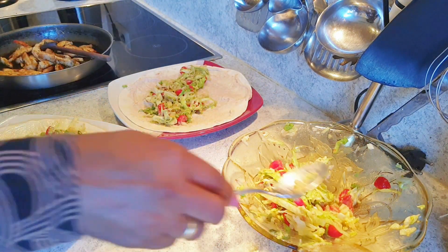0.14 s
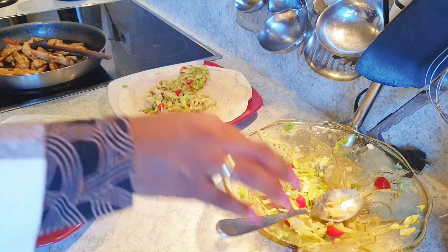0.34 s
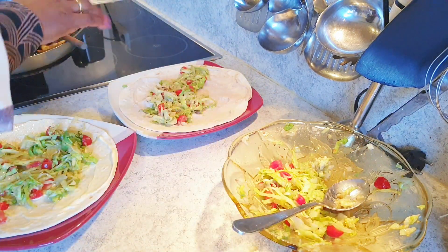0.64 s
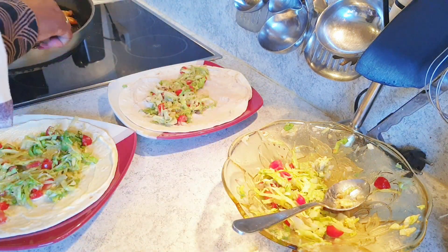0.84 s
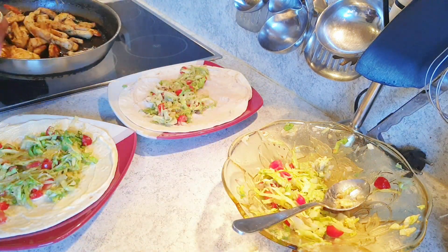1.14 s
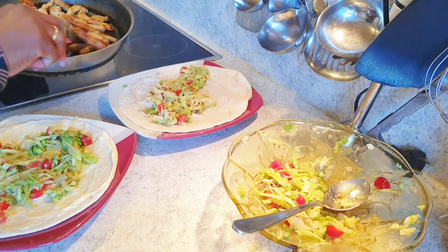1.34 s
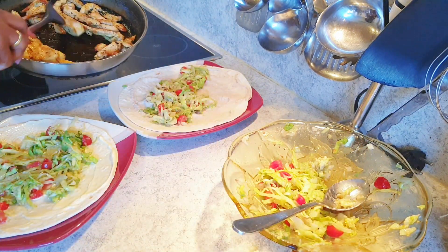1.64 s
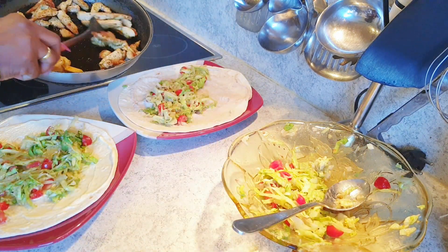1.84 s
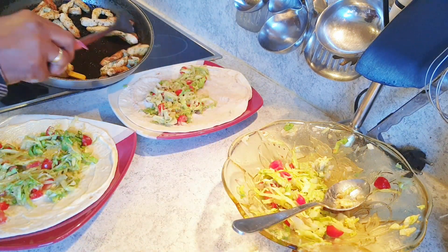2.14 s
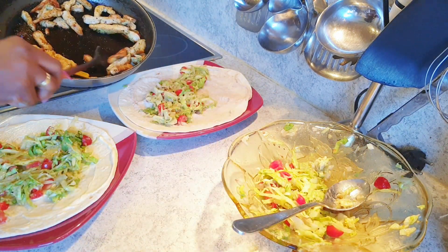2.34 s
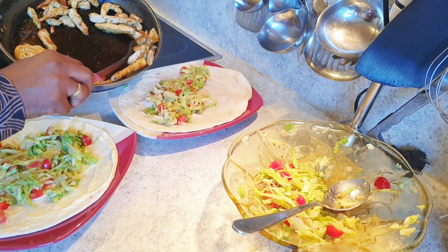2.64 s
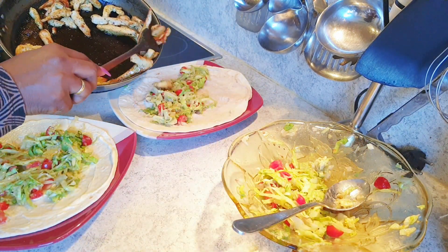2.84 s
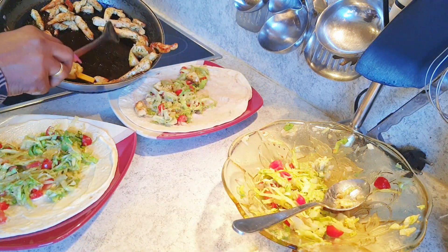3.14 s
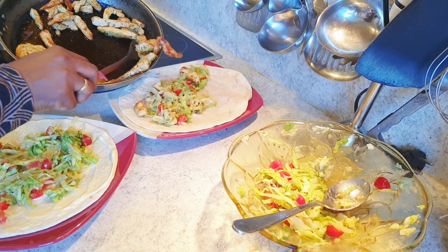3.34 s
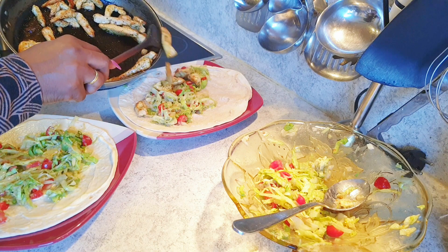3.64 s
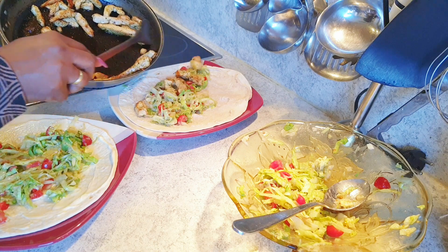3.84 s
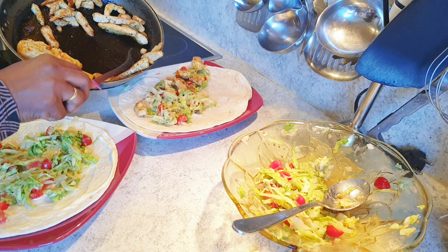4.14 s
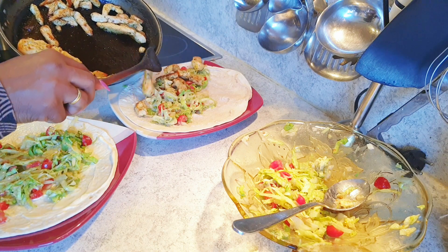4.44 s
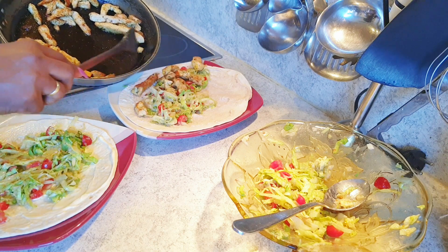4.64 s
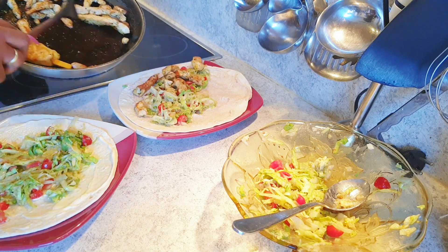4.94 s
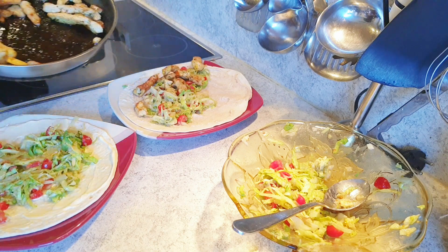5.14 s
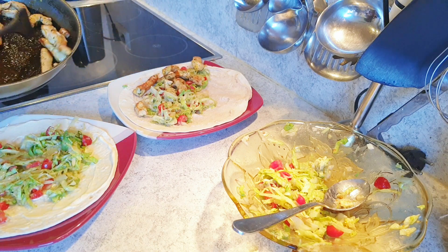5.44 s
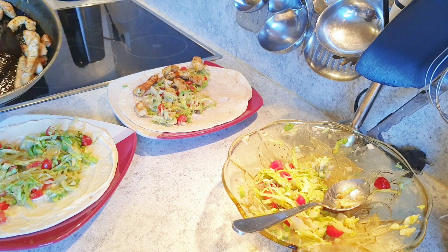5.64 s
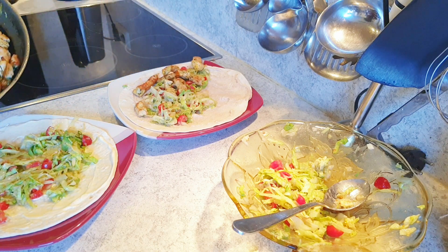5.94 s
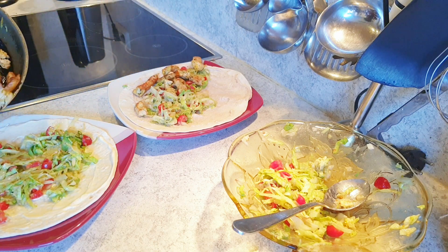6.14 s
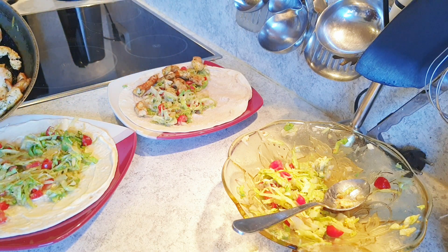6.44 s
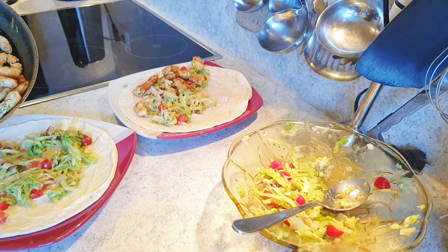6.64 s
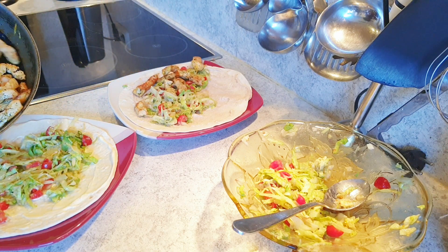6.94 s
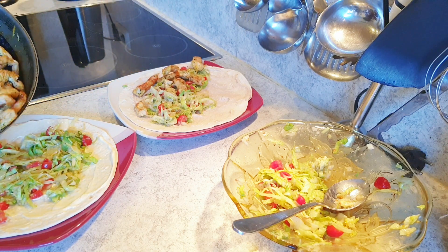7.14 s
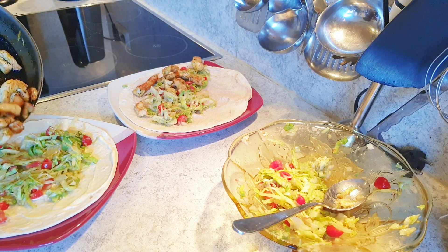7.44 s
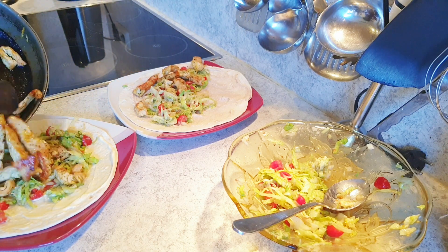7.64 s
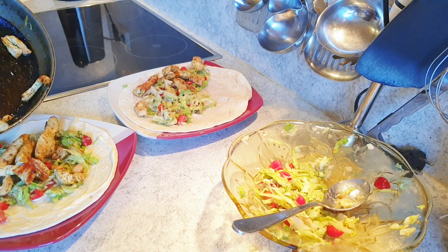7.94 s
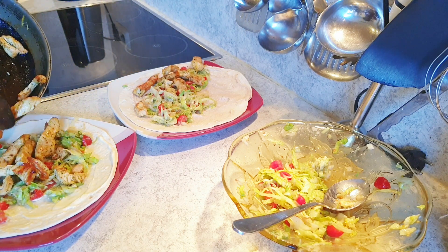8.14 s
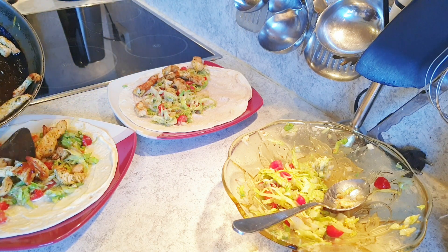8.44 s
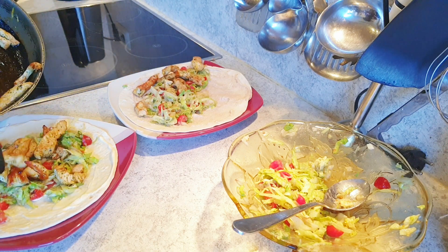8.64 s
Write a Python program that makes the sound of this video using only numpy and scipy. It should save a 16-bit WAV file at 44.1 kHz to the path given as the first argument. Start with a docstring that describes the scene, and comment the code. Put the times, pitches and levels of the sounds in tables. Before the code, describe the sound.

Over steady low humming and rumbling, a metal spoon bounces and settles in a glass bowl with a quick bright clatter. Softer spatula taps and gritty scrapes ring a pan; the heavy pan bumps the counter and drags with a short groan. After a quieter pause and soft greasy hiss, firmer clinks follow, then tiny wet smacks. Near microphone, short lively kitchen reflections.

```python
"""Filling tortillas in a small kitchen, with an appliance humming and rumbling throughout.
A sleeve rustles (filtered friction noise) and a steel spoon rattles to rest in a glass bowl (rung modes).
A spatula then taps and scrapes a ringing frying pan, which knocks and drags on the worktop (stick-slip).
Chicken hisses across the tipped pan, and pieces smack and plop onto a plate (short noise, ticking modes)."""
import sys
import numpy as np
from scipy import signal
from scipy.fft import rfft, irfft
from scipy.io import wavfile

SR = 44100
rng = np.random.default_rng(int(sys.argv[2]) if len(sys.argv) > 2 else 0)


def master_out(mix):
    """Clip the mix to full scale and print it as 16-bit PCM to the path in sys.argv[1]."""
    frames = np.transpose(np.atleast_2d(mix))
    ceiling = np.clip(frames, -1, 1)
    pcm = np.round(ceiling * 32767).astype(np.int16)
    wavfile.write(sys.argv[1], SR, pcm)


N = 388080
TIME = np.arange(N) / SR
CONTACT_TIME = TIME[:SR]  # every contact is computed over one second

# frying pan, close groups of modes: mode_hz, level_db, t60_s, left_minus_right_db
PAN_MODES = [(892, -11, .12, 0), (929, 0, .17, 3), (965, -10, .14, -2), (1021, -16, .18, -4),
             (1060, -12, .025, -1), (1250, -19, .03, -1), (1965, -10, .2, 0), (1995, -11, .22, 1),
             (2026, -6.5, .21, 0), (2100, -14, .03, 0), (3095, -21, .1, -3), (3135, -18, .12, -3),
             (3178, -21, .1, -5), (4350, -30, .1, -2), (4900, -31, .1, -2)]
DRAG_SLIDE = 0.81  # 0 all crunch, 1 full judder


def undb(db):
    """Decibels to gain."""
    return 10 ** (np.asarray(db) / 20)


def sides(pan_db):
    """Left and right gains of equal total power; pan_db is left minus right."""
    gain = undb(np.array([[pan_db], [-pan_db]]) / 2)
    return gain / np.sqrt(np.mean(gain ** 2))


def unit(x):
    """Scale to the energy of a twentieth of a second at full level."""
    return x / np.sqrt(np.sum(x ** 2) * 20 / SR)


def add(out, start_s, x):
    """Mix x into out from start_s."""
    start = max(int(start_s * SR), 0)
    out[:, start:start + x.shape[-1]] += x[..., :N - start]


def lowpass(x, order, cutoff_hz):
    """Butterworth low-pass."""
    return signal.sosfilt(signal.butter(order, cutoff_hz, fs=SR, output="sos"), x)


def highpass(x, order, cutoff_hz):
    """Butterworth high-pass."""
    return signal.sosfilt(signal.butter(order, cutoff_hz, "high", fs=SR, output="sos"), x)


def colour(x, points, size=4096):
    """Minimum-phase filter with a (Hz, dB) response, by folding the cepstrum."""
    hz, db = np.transpose(points)
    freq_hz = np.maximum(np.fft.rfftfreq(size, 1 / SR), 1)
    response_db = np.interp(np.log(freq_hz), np.log(hz), db)
    cepstrum = irfft(np.log(undb(response_db)))
    cepstrum[1:size // 2] *= 2
    cepstrum[size // 2 + 1:] = 0
    impulse = irfft(np.exp(rfft(cepstrum)))
    return signal.fftconvolve(x, impulse)[:len(x)]


def walk(t, rate_hz):
    """Random knots joined by straight lines, with a spread near 1."""
    knots = rng.standard_normal(4096)
    return np.interp(t * rate_hz, np.arange(len(knots)), knots)


def stroke(rise_s, fade_s, touch=0):
    """Pressure builds up from a first touch, then lets go exponentially."""
    t = CONTACT_TIME
    rise = np.minimum(touch + (1 - touch) * t / rise_s, 1)
    return rise * np.exp(-np.maximum(t - rise_s, 0) / fade_s)


def friction(pressure, slip_db=3, slip_rate_hz=350, grain_db=3):
    """Contact force: tiny catches, bunched into slips."""
    t = CONTACT_TIME
    grain = undb(grain_db * rng.standard_normal(len(t)))
    catches = rng.standard_normal(len(t)) * grain
    return pressure * catches * undb(slip_db * walk(t, slip_rate_hz))


def judder(pressure, wander=.11, slip_width=0.044):
    """A dragged pan sticks and slips in an uneven rhythm; slip_width is a share of the cycle."""
    judder_hz = 158.6
    t = CONTACT_TIME
    phase = np.cumsum(judder_hz * (1 + wander * walk(t, 60))) / SR % 1
    slips = np.exp(-phase / slip_width) * undb(6 * walk(t, 150))
    crunch = unit(friction(pressure, slip_db=8.5, slip_rate_hz=270))
    return crunch + DRAG_SLIDE * unit((slips - slips.mean()) * pressure)


def ring(force, modes, tilt_db, pivot_hz, bend=1, detune=0.0033, locked=0):
    """Damped modes share a contact's energy: hard contacts favour high modes, locked force makes them sing."""
    longest_ring_s = .27  # no mode rings longer than this: t60 is capped here
    out = 0
    for k, (hz, db, t60_s, pan_db) in enumerate(modes):
        # each contact detunes the modes a little differently
        loaded_hz = hz * (1 + detune * rng.uniform(-1, 1))
        decay = np.log(1000) / min(t60_s, longest_ring_s)
        pole = np.exp((2j * np.pi * loaded_hz - decay) / SR)
        # the locked force sticks and slips in step with the mode
        in_step = locked * np.cos(2 * np.pi * loaded_hz * CONTACT_TIME)
        z = signal.lfilter([1], [1, -pole], unit(force) + in_step)
        # short waves reach the two microphones out of step
        lag = np.exp(1j * (-1) ** k * min(hz / 620, np.pi / 2))
        # bend above 1: hardness matters most far from the pivot
        octaves = np.log2(hz / pivot_hz)
        gain = undb(db + tilt_db * np.sign(octaves) * abs(octaves) ** bend)
        out = out + gain * sides(pan_db) * np.array([unit(z.real), unit((z * lag).real)])
    return out


def muffle(x):
    """The spatula and the worktop are too soft to ring anything much higher than the cutoff."""
    return lowpass(x, 3, cutoff_hz=7040)


def diffuse(length, split_hz):
    """Stereo noise, alike in the bass and unrelated above split_hz."""
    mid, side = rng.standard_normal((2, N))[:, :length]
    side = highpass(side, 1, split_hz)
    return np.array([mid + side, mid - side]) / np.sqrt(2)


def kitchen(x, wet_db, build_s=0.0071):
    """Hard walls close by: a dense short tail whose treble dies a little sooner."""
    t60_s, treble_t60_s = 0.36, 0.3
    t = TIME[:SR * 2 // 3]
    noise = diffuse(len(t), split_hz=1900)
    low = lowpass(noise, 1, 4000)
    low_tail = low * np.exp(-np.log(1000) * t / t60_s)
    treble_tail = (noise - low) * np.exp(-np.log(1000) * t / treble_t60_s)
    tail = (low_tail + treble_tail) * np.minimum(t / build_s, 1)
    tail /= np.sqrt(np.sum(tail ** 2, axis=1, keepdims=True))
    wet = undb(wet_db)
    return (x + wet * signal.fftconvolve(x, tail, axes=1)[:, :N]) / np.hypot(1, wet)


def spoon():
    """The spoon bounces and skids in the glass bowl: a sharp click, then the glass and steel sing."""
    # spoon on the bowl: start_s, contact_s, level_db, hardness_tilt_db_per_octave
    contacts = [(0.086, 0.016, -45, 2.5), (.157, 0.001, -37.5, 6), (0.1904, 0.0034, -17, 6),
                (.204, 0.015, -27.5, -6), (0.2122, 0.0061, -23, -2.5), (0.2464, 0.00091, -22.5, 3.5),
                (.267, 0.01, -19, 1.5), (.280, 0.0076, -29.5, -3.5), (0.32, 0.0094, -17.5, 4.5),
                (0.3358, 0.0034, -21, -2)]
    # bowl and spoon: mode_hz, level_db, t60_s, left_minus_right_db
    bowl_modes = [(240, -24.5, 0.14, -7.5), (333, -15.5, 0.19, -11.5), (598.6, -3, .17, -3.5),
                  (620, -9, 0.12, -3), (846.5, -11, 0.35, -12.5), (1394, -9.5, .25, -2.5),
                  (2192, -4, 0.24, -4), (2597, -6, 0.21, -0.5), (3125, 2, 0.182, -10),
                  (4222, -4.5, 0.35, -7), (4490, -5, 0.18, -4.5), (4830, -9.5, 0.28, -11),
                  (5260, -4, .1, -3), (5490, 2, .07, -4), (5598, -3, .06, -3), (6702, -8, .15, -3),
                  (6831, -4, .17, -2), (8046, -8, .17, -5), (8300, -9.5, 0.089, -9),
                  (8700, -6, 0.033, -4.5), (11970, -13.5, .1, -4)]
    # click spectrum: freq_hz, level_db
    click_colour = [(40, -4), (200, -11), (450, -10.5), (800, -8.5), (1500, -5), (3000, -5.5), (4300, -5),
                    (5500, -0.5), (7300, -10), (8600, -9), (9800, -17), (11000, -8), (13500, -14),
                    (16000, -17.5)]
    rise_share = 0.16  # of the contact time
    click_per_tilt = .4  # dB of click per dB per octave of hardness
    noise, tone = np.zeros((2, 2, N))
    for start_s, contact_s, db, tilt_db in contacts:
        force = friction(stroke(rise_share * contact_s, contact_s), slip_db=10.5, grain_db=6)
        hard_db = click_per_tilt * tilt_db
        click = unit(colour(force, click_colour))
        add(noise, start_s, sides(pan_db=-2.5) * undb(db + hard_db - 4.0) * click)
        sing = ring(force, bowl_modes, tilt_db, pivot_hz=3220)
        add(tone, start_s, undb(db - hard_db - 9.0) * sing)
    return kitchen(noise, wet_db=4.5) + kitchen(tone, wet_db=-5.5)


def tap_hiss(thud_db):
    """Hiss level: only a heavy tap cracks through the film of grease."""
    heavy_db, hiss_db = -28, -13  # hiss is relative to a heavy thud
    hiss_per_db = 1.9  # lighter thuds lose their hiss faster than their weight
    return thud_db + hiss_db + hiss_per_db * (thud_db - heavy_db)


def spatula_contacts():
    """Taps set in fast and ring duller when soft; longer scrapes let go more slowly."""
    # taps on the pan wall: start_s, contact_s, ring_db, thud_db
    taps = [(.648, 0.019, -42.5, -50.5), (1.0911, 0.026, -29.5, -54), (1.179, .016, -34.5, -55.5),
            (1.365, 0.012, -64, -63.5), (1.641, 0.05, -27.5, -43), (2.176, 0.069, -19.5, -43),
            (5.131, 0.03, -35.5, -54), (5.1642, 0.024, -20, -38.5), (5.451, 0.026, -26, -38.5),
            (6.2755, 0.012, -23, -26), (6.794, 0.033, -25, -30), (7.135, 0.02, -46, -51),
            (7.463, 0.022, -56, -78)]
    # scrapes across the base: start_s, push_s, hiss_db, ring_db, thud_db
    scrapes = [(0.599, 0.046, -44.5, -70, -84), (1.125, 0.053, -39, -46, -77),
               (1.68, 0.052, -22.5, -29, -44), (2.184, 0.017, -30.5, -59, -56),
               (2.275, 0.037, -28, -43.5, -38.5), (2.493, .002, -39, -74, -59),
               (2.821, 0.02, -43, -66, -52), (3.097, 0.065, -27.5, -45, -41),
               (3.28, 0.056, -34.5, -54, -39), (3.459, 0.033, -36.5, -61, -44),
               (3.923, 0.0043, -32, -56, -39.5), (3.974, 0.039, -26.5, -47.5, -36),
               (4.109, 0.063, -37.5, -55.5, -55), (5.1, .03, -44, -54, -59.5), (5.19, 0.02, -37, -37, -75),
               (5.495, 0.016, -40, -41, -48), (6.288, 0.024, -31, -31.5, -41.5),
               (6.342, 0.06, -29.5, -27.5, -35), (6.8, 0.025, -28.5, -28.5, -32.5),
               (6.98, 0.055, -37.5, -53.5, -48), (7.15, 0.019, -42.5, -63, -56),
               (7.271, 0.04, -48.5, -84, -62.5), (7.87, 0.062, -41.5, -60, -52)]
    tap_rise_s = .001
    firm_tilt_db, firm_ring_db, tilt_per_db = -2.5, -21.5, 1.1  # tilt in dB per bent octave
    release_s, release_share, touch = 0.023, 0.39, 0.12  # touch: share of full pressure at onset
    scrape_tilt_db = 5
    contacts = []
    for start_s, contact_s, ring_db, thud_db in taps:
        pressure = stroke(tap_rise_s, contact_s)
        tilt_db = firm_tilt_db + tilt_per_db * (ring_db - firm_ring_db)
        contacts.append((start_s, pressure, tap_hiss(thud_db), ring_db, thud_db, tilt_db))
    for start_s, push_s, hiss_db, ring_db, thud_db in scrapes:
        pressure = stroke(push_s, release_s + release_share * push_s, touch)
        contacts.append((start_s, pressure, hiss_db, ring_db, thud_db, scrape_tilt_db))
    return contacts


def spatula():
    """Each tap or scrape hisses over the greasy base, thuds in the handle and rings the pan wall."""
    # hiss spectrum: freq_hz, level_db
    scrape_colour = [(200, -16.5), (800, -6.5), (2000, 1), (2600, -1.5), (3200, -1.5), (3700, 2), (4500, 3),
                     (6000, 2.5), (8500, 0.5), (9800, -3.5), (11500, 1.5), (14000, -7), (16000, 5.5)]
    # thud spectrum: freq_hz, level_db
    thud_colour = [(40, -13), (170, -0.5), (230, -15.5), (350, 1.5), (570, 5.5), (850, 3.5), (1200, -6),
                   (1600, -5), (2500, -12), (5000, -31), (16000, -63)]
    # where the pan is held: time_s, left_minus_right_db
    pan_place = [(1, -2), (2.3, -2), (3.3, -3), (4.3, -2), (5.3, -2.5), (6.5, -1), (7.6, -1.5)]
    # rubbing in step with the pan wall; it locks only near full pressure
    lock_db, lock_power = -22.5, 4.6
    noise, tone = np.zeros((2, 2, N))
    for start_s, pressure, hiss_db, ring_db, thud_db, tilt_db in spatula_contacts():
        force = friction(pressure, slip_db=5.0, grain_db=2)
        place = sides(np.interp(start_s, *np.transpose(pan_place)))
        add(noise, start_s, place * undb(hiss_db) * unit(colour(force, scrape_colour)))
        add(noise, start_s, place * undb(thud_db) * unit(colour(force, thud_colour)))
        locked = undb(lock_db) * unit(pressure ** lock_power)
        wall = ring(force, PAN_MODES, tilt_db, pivot_hz=885, bend=1.3, locked=locked)
        add(tone, start_s, sides(pan_db=-3.74) * undb(ring_db) * wall)
    return kitchen(noise, wet_db=6) + kitchen(muffle(tone), wet_db=-7.5)


def worktop():
    """The heavy pan knocks down, then judders as it is dragged; sliding booms more than it clatters."""
    # worktop with the pan on it: mode_hz, struck_db, t60_s, left_minus_right_db, sliding_change_db
    worktop_modes = [(104, -11.5, 0.32, -8.5, 6.5), (154.6, -3.5, 0.31, -9.5, -2.5),
                     (232, -5, 0.059, -7.5, -8.5), (292, -5, 0.32, -8, -5), (312.1, -7, 0.17, -9, 7.5),
                     (377.5, -11.5, 0.38, -7, 2.5), (650, -16, 0.17, 8, -15), (811, 0, 0.11, -6.5, -16),
                     (905.5, -7.5, 0.12, 4.5, 0), (1024, -1.5, 0.022, -21.5, -5),
                     (1133, 0, 0.04, -10, -12.5), (1713, -4.5, 0.052, -4, -7), (2030, -17, 0.24, -11, -12),
                     (2670, -6, 0.015, -1.5, -11), (2677, -26.5, 0.043, -0.5, -29),
                     (3740, -12.5, 0.23, -11, -17.5), (4260, -16.5, 0.09, -14.5, -9.5),
                     (4940, -17, 0.076, -13, -9.5)]
    # clatter spectrum: freq_hz, level_db
    clatter_colour = [(30, -12), (70, -16), (110, 1.5), (250, 8.5), (500, -6), (800, 2), (1100, 1),
                      (1420, -16), (1800, -7), (2800, -19.5), (3200, -17.5), (5000, -14.5), (7000, -20.5),
                      (16000, -36)]
    # pan knocking on the worktop: start_s, contact_s, clatter_db, boom_db
    knocks = [(2.5718, 0.0044, -20, -15.5), (2.825, .06, -66.5, -49), (3.1963, 0.0041, -18, -17),
              (3.892, 0.028, -61, -33.5), (3.925, 0.024, -48, -28), (4.306, 0.025, -38, -34)]
    # pan dragged over the worktop, one curve per drag: time_s, pressure_db
    drags = [
        [(3.22, -19), (3.268, -33.5), (3.336, -27), (3.372, -26.5), (3.44, -47), (3.462, -32.5), (3.522, -37.5),
         (3.686, -38), (3.83, -73)],
        [(3.94, -49), (4.004, -32.5), (4.048, -53), (4.1, -66), (4.118, -49.5), (4.286, -33.5), (4.306, -25),
         (4.34, -35.5), (4.46, -56.5)],
    ]
    rise_share = .13  # of the contact time
    dulling_db_per_s = 219  # ring tilt per octave lost per second of contact
    knock_pan_db = -10.5  # ring of the pan wall, relative to the clatter
    drag_boom_db, drag_clatter_db, drag_tilt_db = -4, -11, -0.5
    noise, tone = np.zeros((2, 2, N))
    struck = [mode[:4] for mode in worktop_modes]
    sliding = [(hz, db + DRAG_SLIDE * slide_db, t60_s, pan_db)
               for hz, db, t60_s, pan_db, slide_db in worktop_modes]
    for start_s, contact_s, clatter_db, boom_db in knocks:
        force = friction(stroke(rise_share * contact_s, contact_s), slip_db=2.5, slip_rate_hz=230)
        add(noise, start_s, undb(clatter_db - 3.4) * unit(colour(force, clatter_colour)))
        boom = ring(force, struck, -dulling_db_per_s * contact_s, pivot_hz=312)
        add(tone, start_s, undb(boom_db - 6.5) * boom)
        pan = ring(force, PAN_MODES, tilt_db=-8.5, pivot_hz=929)
        add(tone, start_s, undb(clatter_db + knock_pan_db) * pan)
    for curve in drags:
        times_s, db = np.transpose(curve)
        start_s = times_s[0]
        pressure = undb(np.interp(start_s + CONTACT_TIME, times_s, db, right=-np.inf))
        force = judder(pressure)
        strength = pressure.max() / unit(pressure).max()
        clatter = unit(colour(force, clatter_colour))
        add(noise, start_s, strength * undb(drag_clatter_db) * clatter)
        boom = ring(force, sliding, drag_tilt_db, pivot_hz=321)
        add(tone, start_s, strength * undb(drag_boom_db) * boom)
    return kitchen(sides(pan_db=-2.5) * noise, wet_db=9.5) + kitchen(muffle(tone), wet_db=-0.5)


def food():
    """Soft pieces land with a wet smack and a low plop, and the plate ticks."""
    # chicken landing on the plate: start_s, smack_db, plop_db
    landings = [(7.403, -48, -62), (7.467, -59, -43.5), (7.508, -52, -50), (7.596, -53.5, -59.5),
                (7.6523, -38, -61.5)]
    # smack spectrum: freq_hz, level_db
    smack_colour = [(300, -17.5), (2500, -17), (3200, -5.5), (4000, -6), (5600, 0), (7000, -4.5),
                    (9800, -5.5), (12000, -3), (16000, -12)]
    # plop spectrum: freq_hz, level_db
    plop_colour = [(40, -5), (110, -2.5), (160, 4), (240, -28), (700, -34), (3000, -33), (16000, -70)]
    # plate under the tortilla: mode_hz, level_db, t60_s, left_minus_right_db
    plate_modes = [(5200, -2, 0.09, -3), (6000, -11, 0.05, 4), (5940, 3, 0.051, -5), (7540, -4, 0.056, -2)]
    soft, tick = np.zeros((2, 2, N))
    for start_s, smack_db, plop_db in landings:
        force = friction(stroke(rise_s=0.00096, fade_s=0.012), grain_db=-1.0)
        smack = undb(smack_db) * unit(colour(force, smack_colour))
        plop = undb(plop_db) * unit(colour(force, plop_colour))
        add(soft, start_s, smack + plop)
        plate = ring(force, plate_modes, tilt_db=0, pivot_hz=5600)
        add(tick, start_s, undb(smack_db - 16.5) * plate)
    return kitchen(sides(pan_db=-2.5) * soft + tick, wet_db=4)


def grease():
    """Chicken slides through the grease of the tipped pan: friction noise as a soft hiss."""
    # hiss spectrum: freq_hz, level_db
    slide_colour = [(300, -10), (1500, 1.5), (2600, 2), (4500, 4.5), (8000, -0.5), (12000, -1.5),
                    (16000, -12)]
    start_s, rise_s, fade_s, level_db = 5.58, .18, .21, -42
    out = np.zeros((2, N))
    force = friction(stroke(rise_s, fade_s, touch=0.26))
    hiss = unit(colour(force, slide_colour))
    add(out, start_s, sides(pan_db=-2) * undb(level_db) * hiss)
    return kitchen(out, wet_db=7)


def sleeve(rise_s=0.0064, fade_s=0.17, level_db=-47):
    """A sleeve rustles past as the arm reaches for the bowl: slow-slipping friction noise."""
    # rustle spectrum: freq_hz, level_db
    sleeve_colour = [(30, -1.5), (70, 4.5), (200, -2), (500, 3), (1300, -2.5), (2500, 3), (4500, -6.5),
                     (8000, -14.5), (16000, -26)]
    out = np.zeros((2, N))
    force = friction(stroke(rise_s, fade_s), slip_db=4.0, slip_rate_hz=99)
    rustle = unit(colour(force, sleeve_colour))
    add(out, 0, sides(pan_db=-5.0) * undb(level_db) * rustle)
    return kitchen(out, wet_db=-8.0)


def background():
    """An appliance on the right hums in wavering sines and rumbles in low noise, over a faint hiss."""
    # air spectrum: freq_hz, level_db
    air_colour = [(15, -25), (30, -18), (48, -10), (85, -12), (130, -17), (230, -28.5), (320, -24.5),
                  (520, -34.5), (630, -28.5), (900, -34.5), (2500, -39.5), (8000, -41), (15500, -41)]
    # mains hum: freq_hz, level_db
    hum_partials = [(49.4, -64.5), (98.8, -55.5), (197.6, -68)]
    # the recorder's automatic gain, as a set curve: dips after the loud spoon, then recovers: time_s, gain_db
    gain_curve = [(0, 5), (.5, -8), (1.2, -9.5), (2, -0.5), (3, -0.5), (6.5, 0.5), (8.8, -2)]
    air_db = -56
    air = np.array([colour(x, air_colour) for x in diffuse(N, split_hz=33)])
    air = highpass(air, 4, 38)
    air *= undb(air_db) / np.std(air)
    rumble = lowpass(air, 1, 900)
    hum = np.zeros(N)
    for hz, db in hum_partials:
        amplitude = np.sqrt(2) * undb(db + 2.1 * walk(TIME, 4.6))
        hum += amplitude * np.sin(2 * np.pi * hz * TIME + 0.37 * walk(TIME, 2.3))
    gain_db = np.interp(TIME, *np.transpose(gain_curve))
    hiss = (air - rumble) * undb(0.98 * gain_db)
    return hiss + sides(pan_db=-7.0) * (rumble + hum) * undb(gain_db)


def scene():
    """Sleeve, spoon, spatula, pan and food in the kitchen, over the hum."""
    return sleeve() + spoon() + spatula() + grease() + worktop() + food() + background()


def record(dry):
    """The recorder clips at full scale and cuts the top."""
    top_hz = 15400
    clipped = np.clip(dry, -1, 1)
    return signal.sosfilt(signal.ellip(10, .2, 60, top_hz, fs=SR, output="sos"), clipped)


dry = scene()
out = record(dry)
master_out(out)
```